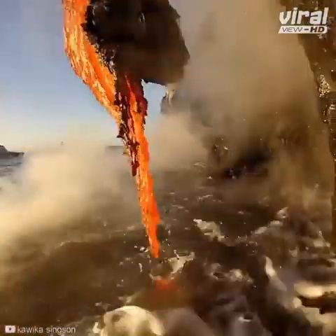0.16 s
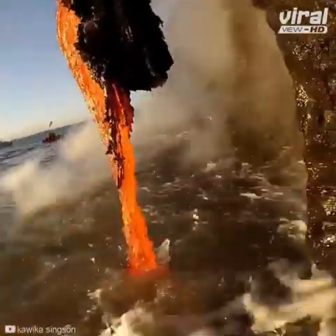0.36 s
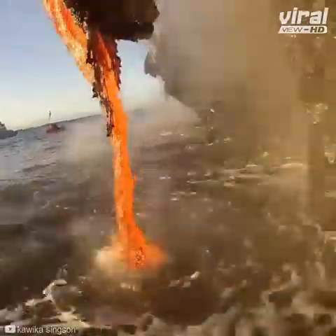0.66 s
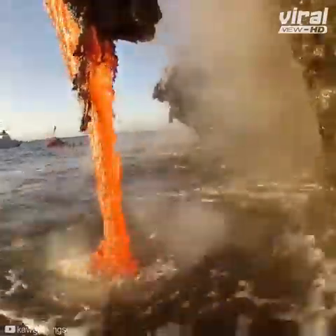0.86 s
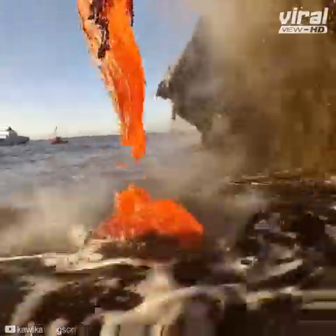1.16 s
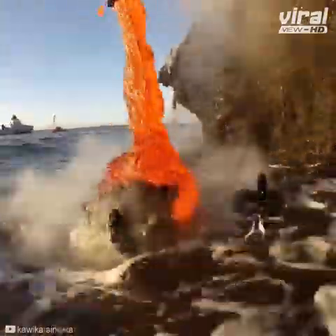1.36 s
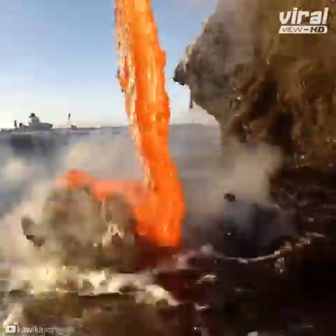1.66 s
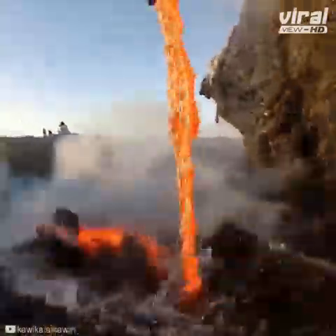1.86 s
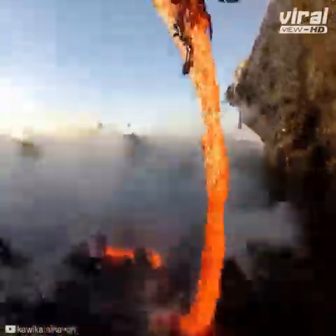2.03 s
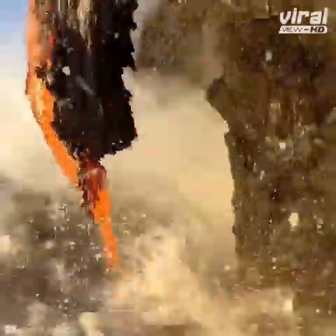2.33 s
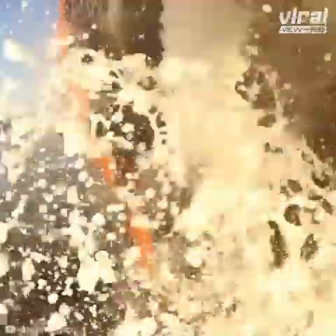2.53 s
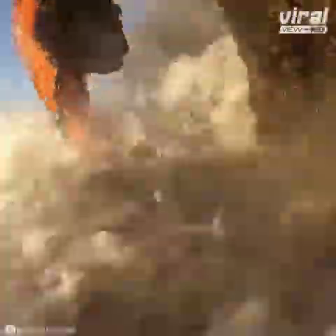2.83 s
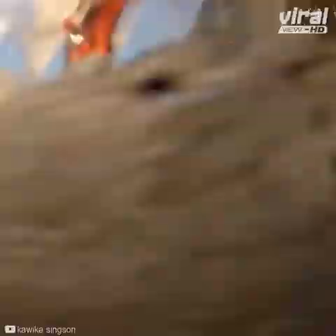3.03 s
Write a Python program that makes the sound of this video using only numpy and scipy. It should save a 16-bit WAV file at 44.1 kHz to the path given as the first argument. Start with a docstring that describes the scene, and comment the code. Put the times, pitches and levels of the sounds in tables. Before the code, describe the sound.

Sea surf hisses quietly at the shore through a waterproof housing; a sharp hollow knock comes early, then a wave swells and smashes over the microphone with spray, cracks and gulps, nearly mono.

```python
"""Surf at the sea's edge hisses and rumbles and a wave rushes up, heard inside a waterproof housing on a pole.
Surf is noise filtered by the housing's port; slaps are shaped bursts of spray, each with a dull thud of water.
Cracks, clicks, spurts and gulps join a noise tick to a wobbling ring; bumps excite damped modes of pole and
housing. Heaves are decaying low sines. One microphone behind a small port hears it all, nearly in mono."""
import sys
import numpy as np
from scipy import signal
from scipy.io import wavfile
from scipy.ndimage import uniform_filter1d

SR = 44100
rng = np.random.default_rng(int(sys.argv[2]) if len(sys.argv) > 2 else 0)


def transcribe(signal):
    """Save signal, clipped to [-1, 1], as a 16-bit WAV file at the path in sys.argv[1]."""
    frames = np.atleast_2d(signal).T
    limited = np.clip(frames, -1, 1)
    pcm = np.round(limited * 32767).astype(np.int16)
    wavfile.write(sys.argv[1], SR, pcm)


N = 138915

# transmission of the housing's port, with its notches: frequency_hz, density_db (dB per Hz)
PORT_COLOUR = [(250, -51), (400, -15), (600, -4.5), (820, -10), (1000, -4), (1250, -10), (1600, -3.5),
               (1950, 2), (2400, -2), (3000, -6.5), (4200, -12.5), (5300, -13.5), (6000, -29.5),
               (6800, -16), (8200, -18), (9500, -14.5), (10500, -21.5), (11300, -32), (12000, -56),
               (12900, -26), (14300, -21), (15400, -31), (16000, -15)]
# spectrum of sloshing water: frequency_hz, density_db (dB per Hz)
SLOSH_COLOUR = [(60, -44.5), (100, -5), (200, -2), (300, -9.5), (450, -10), (800, -35.5)]


def surf():
    """Superposition of filtered noises: foam hiss through the port, low slosh and rumble, each on its own level."""
    # course of the surf: time_s, hiss_db, rumble_db, slosh_db
    surf_levels = [(0.0, -41.5, -53, -48), (0.12, -43, -47, -51.5), (0.23, -48.5, -49, -43),
                   (0.38, -47.5, -47.5, -55.5), (0.46, -48, -45, -58), (0.63, -50, -52, -58.5),
                   (0.8, -44.5, -46, -54.5), (1.34, -46, -49.5, -53.5), (1.46, -44.5, -47, -52),
                   (1.86, -44, -51, -53.5), (2.01, -42.5, -52, -49.5), (2.15, -36.5, -46, -39),
                   (2.25, -37.5, -41, -39), (2.35, -35.5, -39, -40.5), (2.52, -32.5, -66, -38),
                   (2.66, -41.5, -39, -49), (2.79, -38, -47, -45.5), (2.9, -41, -52, -44.5),
                   (3.15, -45, -43, -49)]
    # spectrum of the rumble: frequency_hz, density_db (dB per Hz)
    rumble_colour = [(12, -26.5), (25, 7), (50, 5.5), (75, -1), (100, -15), (140, -64)]
    time_s, hiss_db, rumble_db, slosh_db = np.transpose(surf_levels)
    t = np.arange(N) / SR

    foam = patchy(fizz(grain_db=-0.35, grain_s=.001), patch_db=1.24, flicker_db=0.85)
    hiss = colour(foam, lambda hz: read(PORT_COLOUR, hz))
    rumble = colour(fizz(grain_db=0.0, grain_s=.03), lambda hz: read(rumble_colour, hz))
    slosh = colour(fizz(grain_db=1.63, grain_s=0.016), lambda hz: read(SLOSH_COLOUR, hz))

    layers = ((hiss_db, hiss), (rumble_db, rumble), (slosh_db, slosh))
    return sum(gain_of(np.interp(t, time_s, db)) * layer for db, layer in layers)


def slaps():
    """Impact of water sheets: gated noise and droplets through the port, each with a thud of moving water."""
    # water sheets hitting the housing: start_s, rise_s, hold_s, fall_s (time to fall 20 dB),
    # level_db, treble_db (per octave, 2.5 to 10 kHz), low_mid_db (per octave, 1800 down to 450 Hz), thud_db
    sheets = [(0.609, 0.0057, 0.012, 0.02, -47, 0, -4, -50), (0.666, .003, 0.021, 0.06, -46, 0.5, -16, -54),
              (1.483, 0.013, 0.036, 0.086, -50.5, 0, 6, -47.5),
              (1.576, 0.0083, 0.006, 0.024, -54, 0, 5, -54),
              (2.122, 0.0053, 0.0079, 0.017, -38.5, -1, -10, -61),
              (2.412, 0.018, 0.018, .007, -26.5, -0.5, 0, -28.5),
              (2.454, 0.0072, 0.0063, 0.024, -31, -9, 1.5, -35),
              (2.49, 0.0019, .004, 0.051, -30.5, -2.5, 8, -40),
              (2.554, .008, 0.024, 0.014, -36, -11, 2.5, -38.5),
              (2.599, 0.0016, 0.024, 0.019, -37.5, -2.5, 4, -33.5),
              (2.641, 0.02, 0.0068, 0.011, -20.5, 0.5, -0.5, -29.5),
              (2.873, 0.01, .011, .003, -30, 1.5, -1.5, -51),
              (2.901, 0.0031, 0.012, 0.021, -26, 1, 2.5, -37), (3.093, .004, .004, 0.016, -43, 2, 1, -55),
              (3.129, 0.0034, 0.022, 0.0097, -32.5, -4, 6.5, -41)]
    drops = droplets(per_s=2500, low_hz=618, high_hz=12170, cycles=3.04, size_db=2.5)
    spray = fizz(grain_db=0.5, grain_s=0.0023) + gain_of(-6.5) * drops
    push = rng.standard_normal(N)
    out = np.zeros(N)
    pad = np.zeros(1500)  # room for the filters to ring out, in samples

    for start_s, rise_s, hold_s, fall_s, level_db, treble_db, low_mid_db, thud_db in sheets:
        t = np.arange(0, rise_s + hold_s + 3 * fall_s, 1 / SR)
        decay = gain_of(-20 * np.maximum(t - rise_s - hold_s, 0) / fall_s)
        shape = np.minimum(t / rise_s, 1) * decay
        at = min(round(start_s * SR), N - len(t))

        def tilted_port(hz):
            treble = treble_db * np.log2(np.clip(hz / 2500, 1, 4))
            low_mid = low_mid_db * np.log2(np.clip(1800 / (hz + 1), 1, 4))
            return read(PORT_COLOUR, hz) + treble + low_mid

        burst = np.r_[shape * spray[at:at + len(t)], pad]
        add(out, start_s, gain_of(level_db) * colour(burst, tilted_port))
        thud = np.r_[shape * push[at:at + len(t)], pad, pad]
        add(out, start_s, gain_of(thud_db) * colour(thud, lambda hz: read(SLOSH_COLOUR, hz)))
    return out


def cracks():
    """Transient excitation: a broad noise tick and a frequency-modulated ring share one fast decay."""
    # cracks, clicks, spurts and gulps on the housing, among them the click of a bump:
    # time_s, peak_db, pitch_hz, length_s (time to fall 17 dB), ring_db (against tick, before a common -8 dB)
    snaps = [(0.2148, -14.5, 2410, 0.0065, 7), (0.672, -39, 2010, .004, 4), (.8733, -30, 930, 0.0035, 14),
             (2.1282, -31, 3900, 0.0033, -7), (2.4246, -13, 2330, 0.0093, 13),
             (2.4494, -14, 1570, 0.0066, 7), (2.455, -13.5, 1590, 0.0058, 22),
             (2.462, -6.5, 2990, 0.0054, -2.5), (2.465, -22, 1500, .0032, 6),
             (2.4928, -11, 1580, 0.0062, 4.5), (2.5096, -17, 1210, 0.0035, 10),
             (2.6038, -18.5, 1380, 0.0055, 6), (2.637, -18, 1230, 0.0049, 4),
             (2.6847, -20, 2000, 0.0038, 22), (2.8717, -29, 4020, 0.028, 15), (2.88, -22, 1696, 0.012, 23),
             (2.8952, -6, 2500, 0.0099, -7.5), (2.9117, -14.5, 978, 0.009, 8.5),
             (2.9966, -28, 3000, .0022, -7), (3.0912, -29, 2240, .0042, 7), (3.1356, -23, 1480, .0042, 6),
             (3.1452, -22, 1190, .0032, 3)]
    out = np.zeros(N)
    noise = rng.standard_normal((len(snaps), 2, 1400))
    t = np.arange(1400) / SR
    for (time_s, peak_db, pitch_hz, length_s, ring_db), (tick_noise, pitch_noise) in zip(snaps, noise):
        shape = np.minimum(t / 0.0004, 1) * gain_of(-17 * t / length_s)
        wobble = 1 + 0.082 * evened(uniform_filter1d(pitch_noise, 30))
        ring = shape * np.sin(2 * np.pi * np.cumsum(pitch_hz * wobble) / SR)
        tick = colour(tick_noise * shape, lambda hz: 0.92 * read(PORT_COLOUR, hz))
        snap = .5 * tick + gain_of(ring_db - 8) * ring
        add(out, time_s, gain_of(peak_db) * snap / abs(snap).max())
    return out


def bumps():
    """Modal excitation: a soft push and a gritty scrape convolve with damped modes; loose parts buzz along."""
    # bumps on the pole: time_s, strength_db, contact_s (half the time for the push to peak), damping (factor), grit_db
    blows = [(.0, -30.5, 0.00044, 2.4, -39), (0.2154, -2.5, 0.00043, 0.93, -47.5),
             (.8741, -28.5, 0.00023, 6.6, -55), (1.4881, -37, 0.00048, 0.91, -43),
             (1.5029, -31, 0.0006, 1.1, -52), (2.438, -19.5, 0.00055, 1.2, -50.5),
             (2.4946, -20.5, 0.00048, 4.5, -52), (2.8957, -20, 0.00037, 9.9, -50)]
    # modes of pole and housing: frequency_hz, level_db, t60_s (at damping 1)
    pole_modes = [(66.6, -9, 0.16), (132, -16.5, 0.21), (158.4, -3, 0.13), (201, 5, 0.12),
                  (249, -19.5, 0.21), (288, -13, 0.125), (345, -13, 0.048), (570, -7, 0.096),
                  (660, -35, 0.066), (1037, -15.5, .08), (1475, -39, .045), (1863, -18, 0.086),
                  (2765, -25, .035)]
    # loose parts buzzing after a bump: frequency_hz, width_hz (of each of two passes), level_db (over the grit)
    loose_parts = [(10550, 2500, 9.5), (14300, 790, 4)]
    rattle_hold_s, rattle_t60_s = 0.023, 0.087  # both at damping 1
    swell_db_per_s, grit_lead_s = 1400, 0.019  # the scrape starts just before the blow
    scrape_band = signal.butter(4, (432, 2870), "band", fs=SR, output="sos")  # edges in Hz

    out = np.zeros(N)
    t = np.arange(0, .3, 1 / SR)
    noise = rng.standard_normal((len(blows), 2, len(t)))
    lead = round(grit_lead_s * SR)
    after = t - lead / SR  # time from the blow, negative before it
    for (time_s, strength_db, contact_s, damping, grit_db), (buzz_noise, grit_noise) in zip(blows, noise):
        modes = sum(gain_of(level_db - 60 * t * damping / t60_s) * np.cos(2 * np.pi * hz * t)
                    for hz, level_db, t60_s in pole_modes)
        swell_db = np.minimum(swell_db_per_s * after, 0)
        decay_db = 60 * np.maximum(after * damping - rattle_hold_s, 0) / rattle_t60_s
        shake = gain_of(swell_db - decay_db)

        u = np.clip(after / contact_s, 0, 30)
        push = u * u * np.exp(-u)
        # squaring with the sign kept makes the scrape spiky
        grit = signal.sosfilt(scrape_band, grit_noise * np.abs(grit_noise) * shake)
        force = gain_of(grit_db) * grit - push / push.sum()
        ring = signal.fftconvolve(modes, force)[:len(t)]

        parts = sum(gain_of(level_db + grit_db) * evened(resonate(resonate(buzz_noise, hz, width), hz, width))
                    for hz, width, level_db in loose_parts)
        buzz = shake * (after > 0) * parts
        early = min(lead, round(time_s * SR))
        add(out, time_s - early / SR, gain_of(strength_db) * (ring + buzz)[lead - early:])
    return out


def heaves():
    """Damped low oscillation: cycles of pressure as the pole sways and water shoves the housing."""
    # heaves: time_s, level_db (start of the decay), pitch_hz, t60_s
    shoves = [(0.611, -35, 50.8, 0.28), (1.488, -27.5, 43, .25), (1.572, -32, 50, .15), (2.15, -35, 45, .2),
              (2.219, -32, 40, .25), (2.498, -14, 106, 0.073), (2.654, -30.5, 70, 0.13),
              (2.893, -23, 65, 0.13), (3.116, -34, 45, .2)]
    rise_s = 0.0064
    out = np.zeros(N)
    t = np.arange(0, .3, 1 / SR)
    for time_s, level_db, pitch_hz, t60_s in shoves:
        shape = gain_of(level_db - 60 * t / t60_s) * np.minimum(t / rise_s, 1)
        add(out, time_s, shape * np.sin(2 * np.pi * pitch_hz * t))
    return out


def droplets(per_s, low_hz, high_hz, cycles, size_db):
    """Granular superposition: randomly timed pitched grains, each decaying over a few cycles as its pitch rises."""
    pick, out = rng.random((N, 2)).T, np.zeros(N)
    struck = pick[0] < per_s / SR
    size = gain_of(size_db * np.minimum(rng.exponential(1, N), 4)) * struck
    for k, hz in enumerate(np.geomspace(low_hz, high_hz, 24)):
        u = np.arange(0, 3 * cycles, hz / SR)  # time in cycles
        grain = np.sin(2 * np.pi * u * (1 + 0.018 * u)) * np.minimum(u, 1) * np.exp(-u / cycles)
        hits = size * (np.floor(pick[1] * 24) == k)
        out += signal.oaconvolve(hits, grain / np.linalg.norm(grain))[:N]
    return evened(out)


def fizz(grain_db, grain_s):
    """Random amplitude modulation: white noise whose level moves from grain to grain, as bursting foam."""
    shortest_s = .0003
    steps = rng.exponential(1, int(N / SR / shortest_s) + 2)
    position = np.arange(N) / SR / max(grain_s, shortest_s)
    level_db = np.interp(position, np.arange(len(steps)), grain_db * steps)
    return evened(gain_of(level_db) * rng.standard_normal(N))


def patchy(x, patch_db, flicker_db):
    """Time-frequency modulation: drifting patches, and a flicker shared by all bands (both RMS dB)."""
    hz, t, z = signal.stft(x, SR, nperseg=512)
    patches = rng.standard_normal(z.T.shape).T
    patches = uniform_filter1d(uniform_filter1d(patches, 8, 0), 8, 1)
    flicker = uniform_filter1d(rng.standard_normal(len(t)), 3)
    gain = gain_of(patch_db * evened(patches) + flicker_db * evened(flicker))
    return evened(signal.istft(z * gain, SR, nperseg=512)[1][:N])


def colour(x, db_of_hz):
    """Minimum-phase filtering: a causal response of the given shape in dB, scaled to keep white noise's level."""
    hz = abs(np.fft.fftfreq(8192, 1 / SR))
    log_gain = np.log(gain_of(np.maximum(db_of_hz(hz), -90)))
    # the Hilbert transform of the log gain gives the minimum phase
    taps = np.fft.ifft(np.exp(np.conj(signal.hilbert(log_gain)))).real[:4096]
    return signal.oaconvolve(x, taps / np.linalg.norm(taps))[:len(x)]


def resonate(x, hz, width_hz):
    """Second-order resonance: a two-pole peak of gain 1."""
    return signal.lfilter(*signal.iirpeak(min(hz, .45 * SR), hz / width_hz, SR), x)


def gain_of(db):
    """Decibel law: level in dB to amplitude ratio."""
    return 10 ** (np.asarray(db) / 20)


def evened(x):
    """Power normalisation: scale to an RMS of 1."""
    return x / np.sqrt(np.mean(x ** 2) + 1e-20)


def read(points, hz):
    """Spectral interpolation: straight lines in dB over log frequency."""
    f, value = np.transpose(points)
    return np.interp(np.log(hz + 1), np.log(f + 1), value)


def add(mix, start_s, sound):
    """Linear superposition: add a sound into the mix in place, cut at the mix's end."""
    part = mix[round(start_s * SR):][:len(sound)]
    part += sound[:len(part)]


def scene():
    """Partial decorrelation: a faint phase-scrambled side signal follows the nearly mono sum of the sources."""
    side_db, tilt_db_per_octave = -43.5, 3  # side against mid, about 4 kHz
    mid = surf() + slaps() + cracks() + bumps() + heaves()
    hz, t, z = signal.stft(mid, SR, nperseg=512)
    turn = np.exp(2j * np.pi * rng.random(z.T.shape).T)
    gain = gain_of(side_db + tilt_db_per_octave * np.log2((hz[:, None] + 20) / 4000))
    side = signal.istft(z * turn * gain, SR, nperseg=512)[1][:N]
    return np.array([mid + side, mid - side])


def record(dry):
    """Soft saturation and band limiting: the loudest peaks bend towards a ceiling, then a low-pass follows."""
    ceiling, edge_hz = .9, 15900
    soft = ceiling * np.tanh(dry / ceiling)
    low_pass = signal.firwin(511, edge_hz, window=("kaiser", 9), fs=SR)
    return signal.oaconvolve(soft, low_pass[None], "same")


dry = scene()
out = record(dry)
transcribe(out)
```